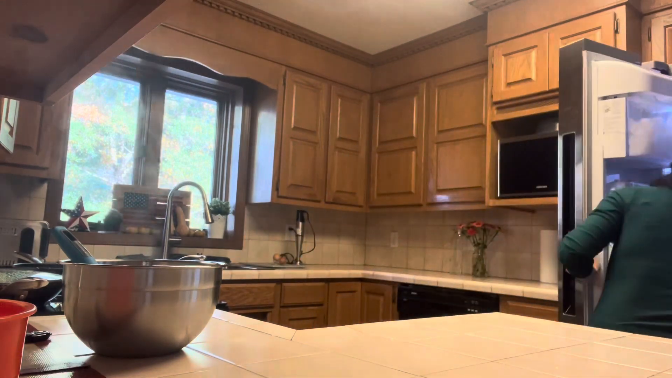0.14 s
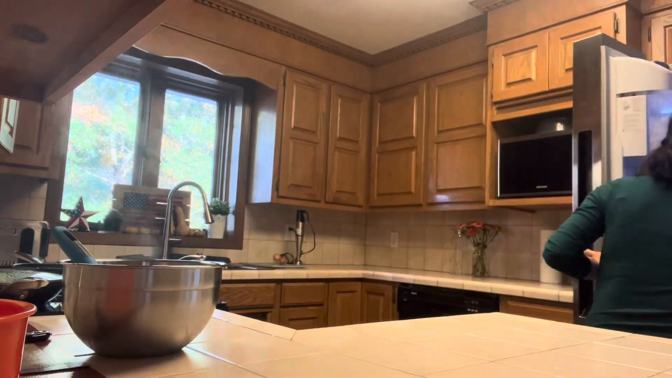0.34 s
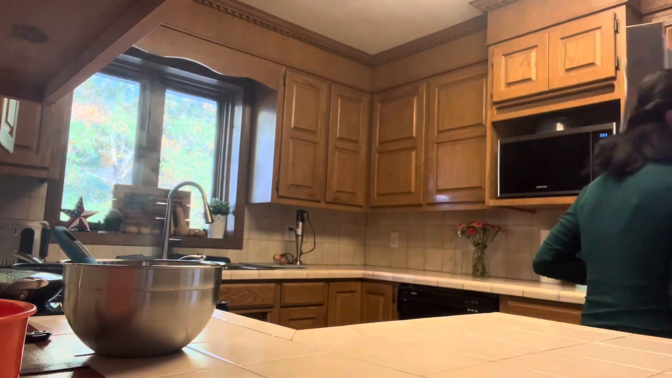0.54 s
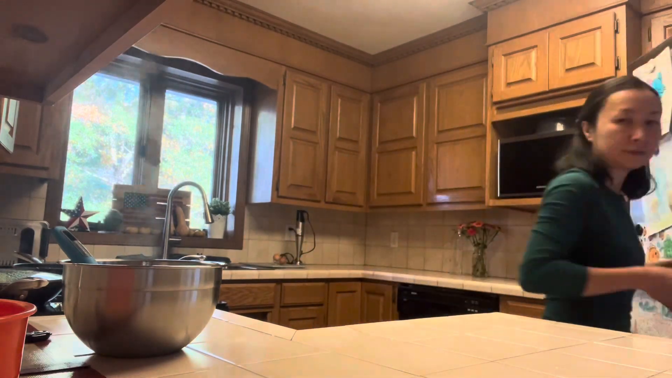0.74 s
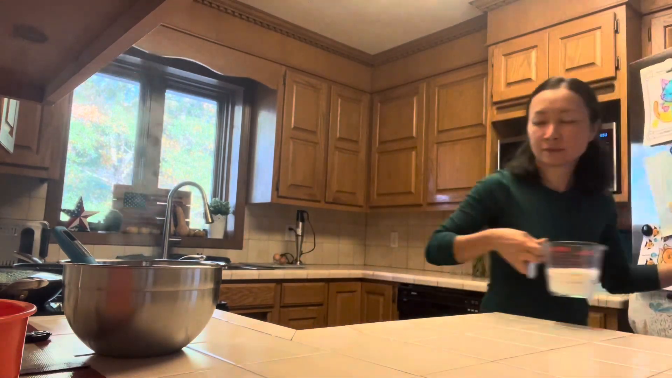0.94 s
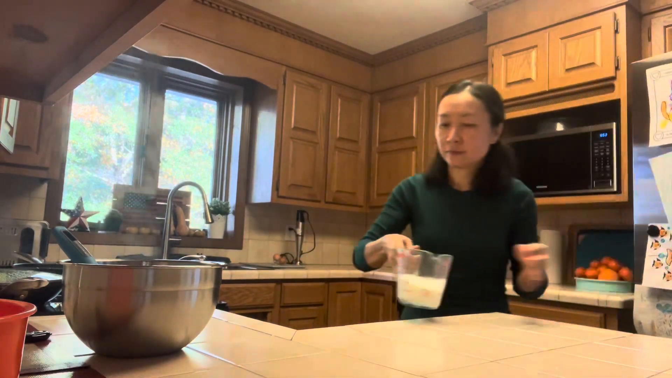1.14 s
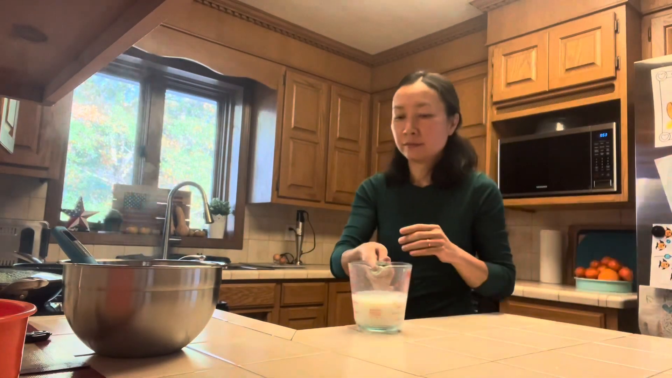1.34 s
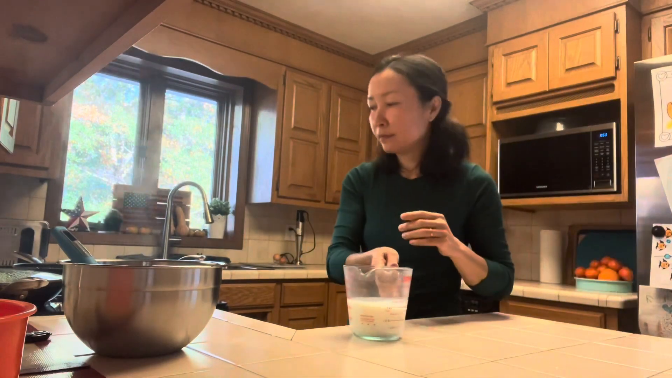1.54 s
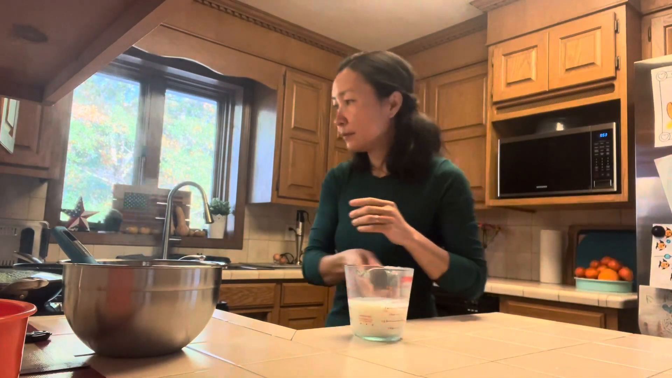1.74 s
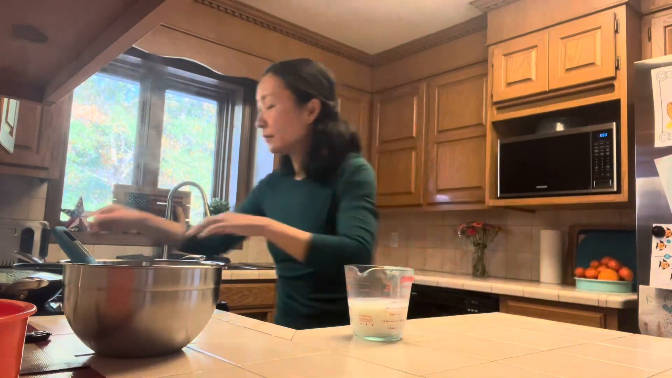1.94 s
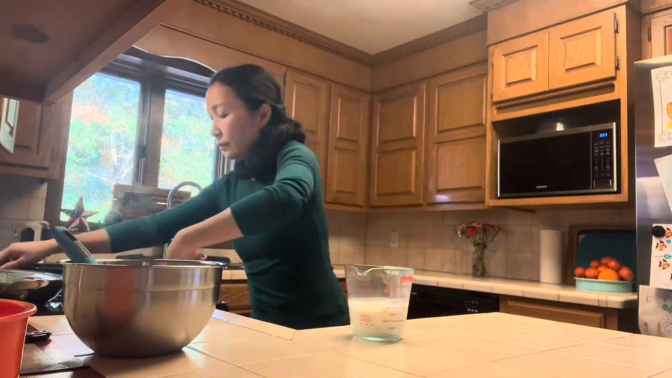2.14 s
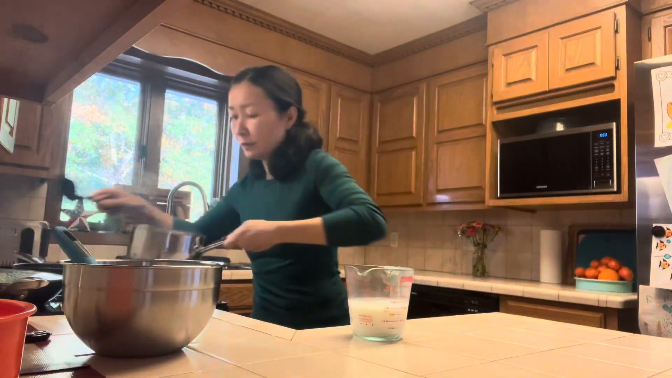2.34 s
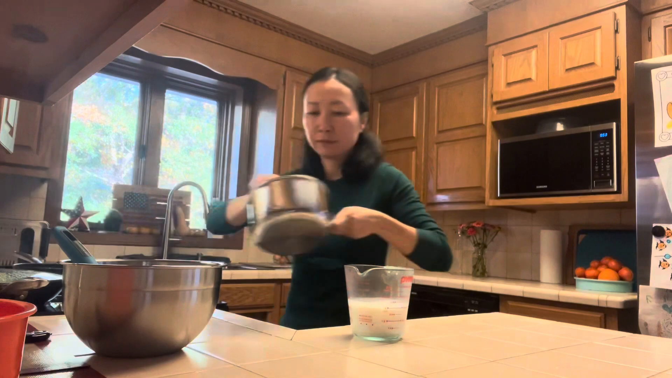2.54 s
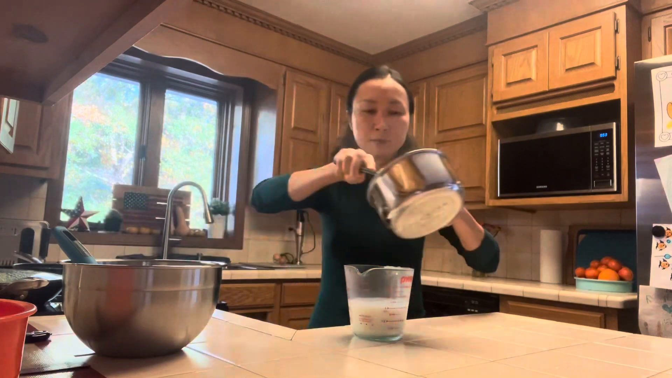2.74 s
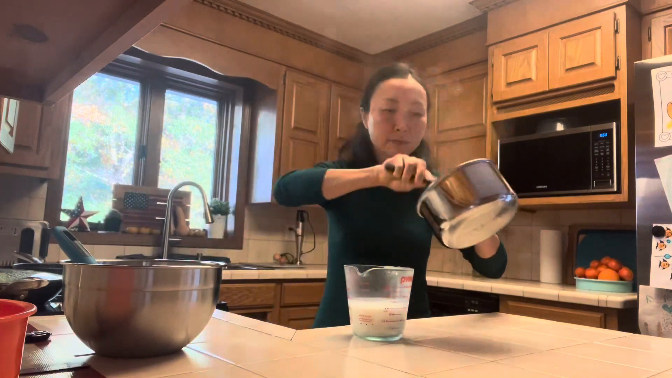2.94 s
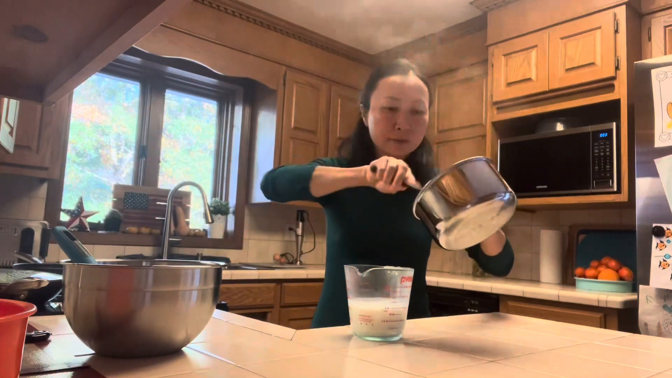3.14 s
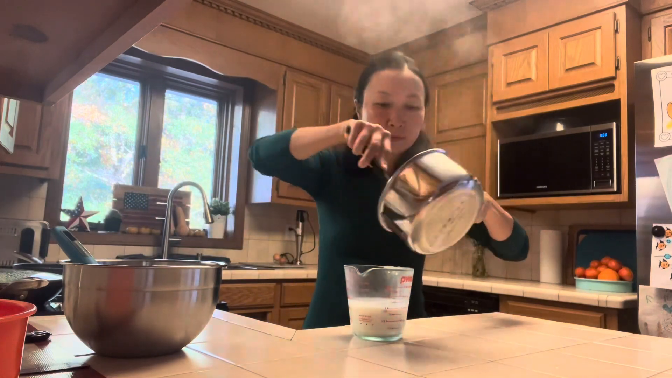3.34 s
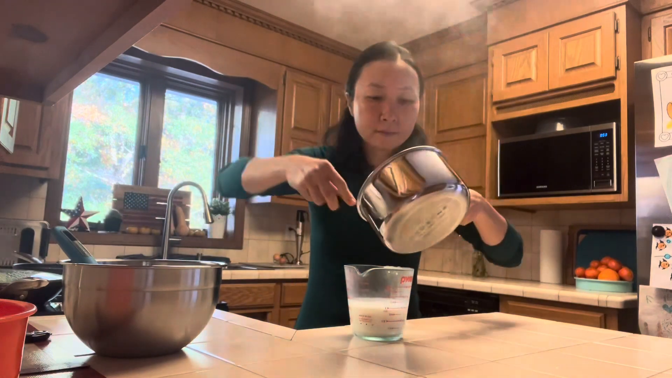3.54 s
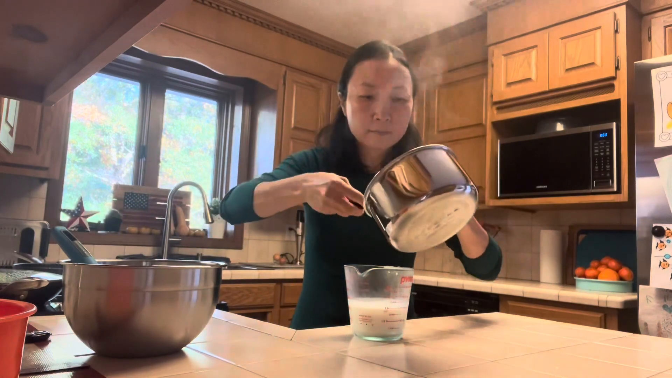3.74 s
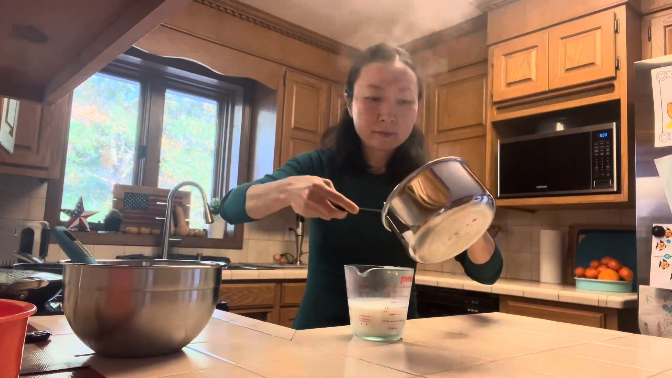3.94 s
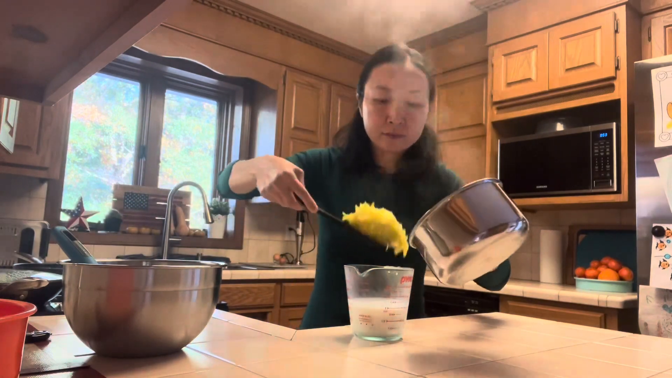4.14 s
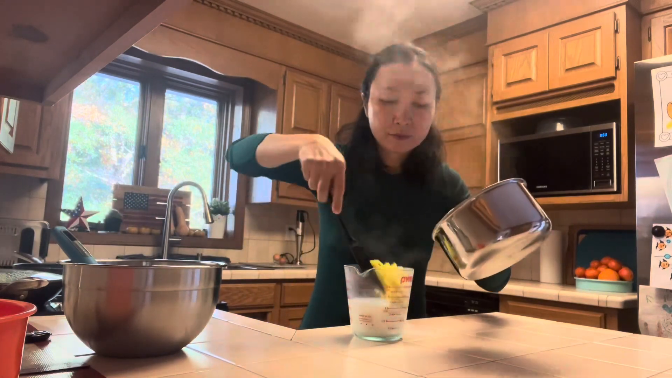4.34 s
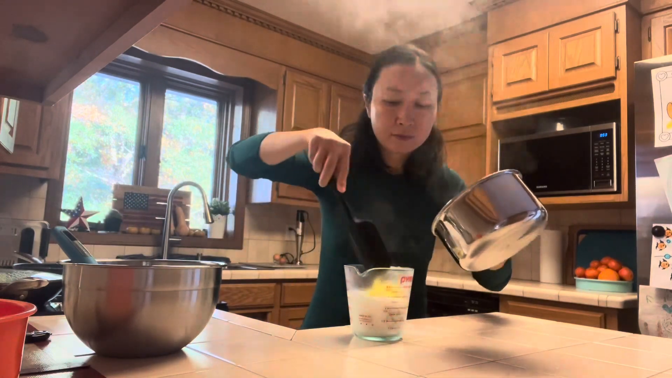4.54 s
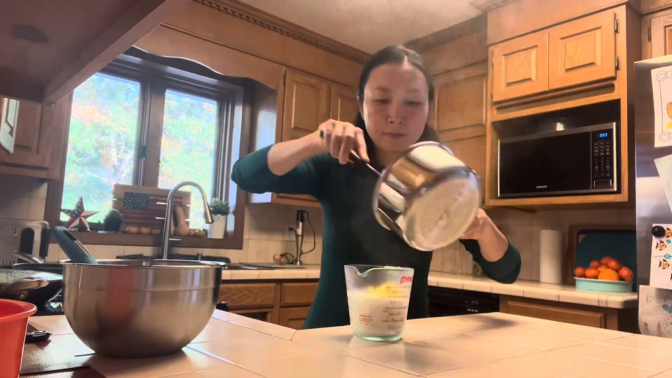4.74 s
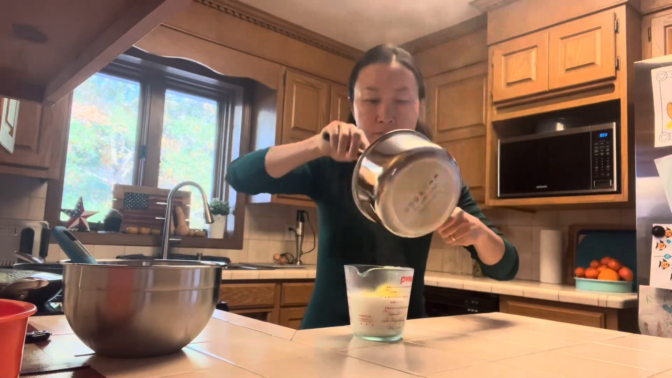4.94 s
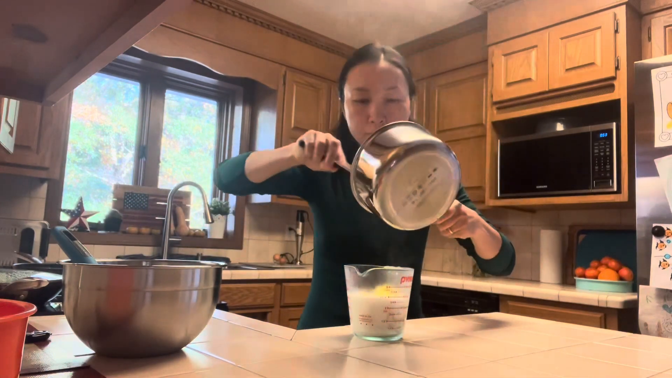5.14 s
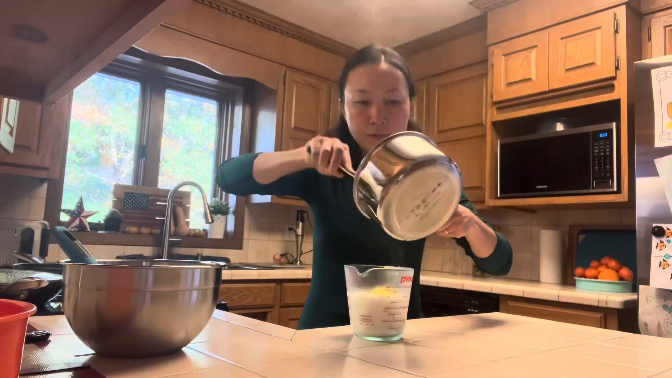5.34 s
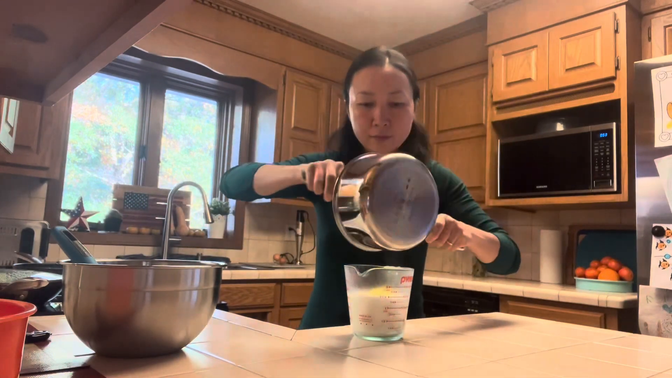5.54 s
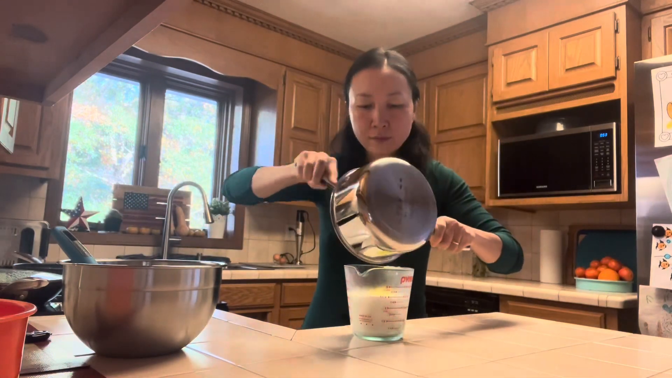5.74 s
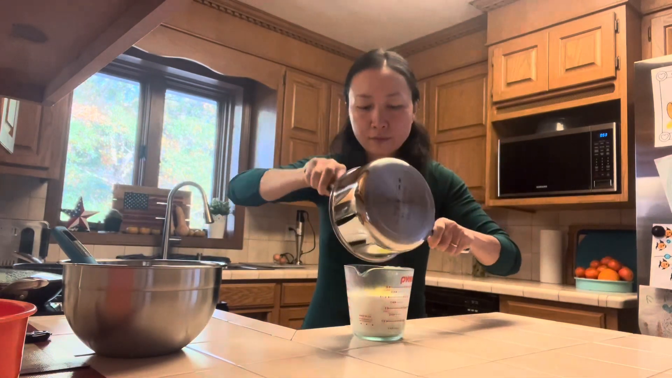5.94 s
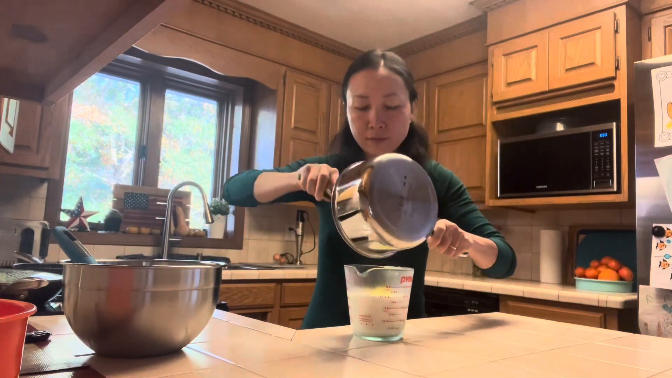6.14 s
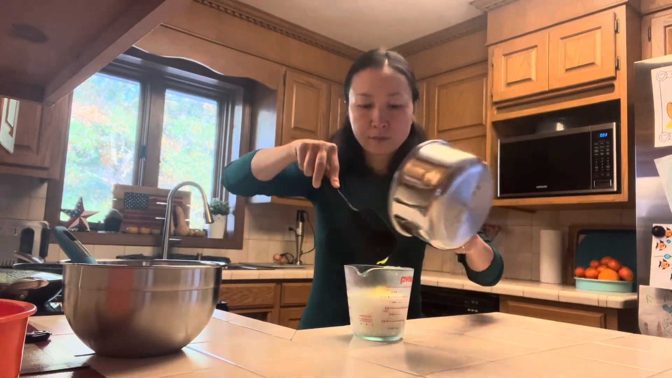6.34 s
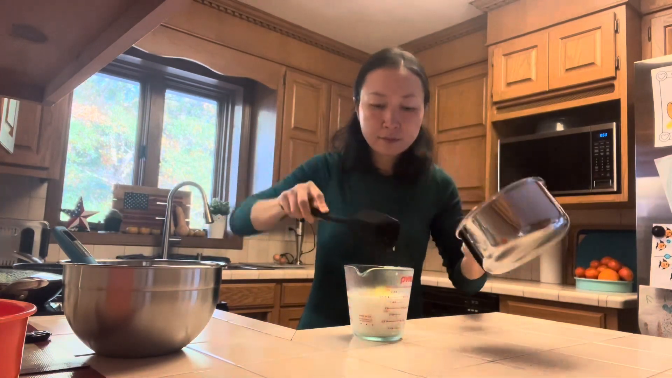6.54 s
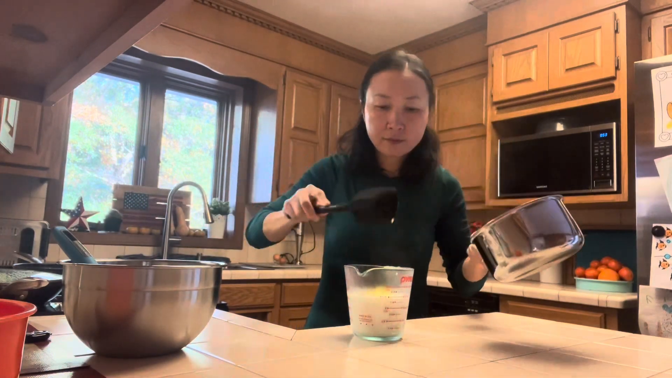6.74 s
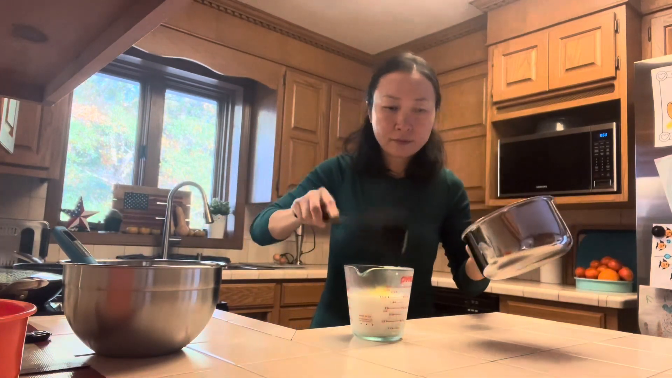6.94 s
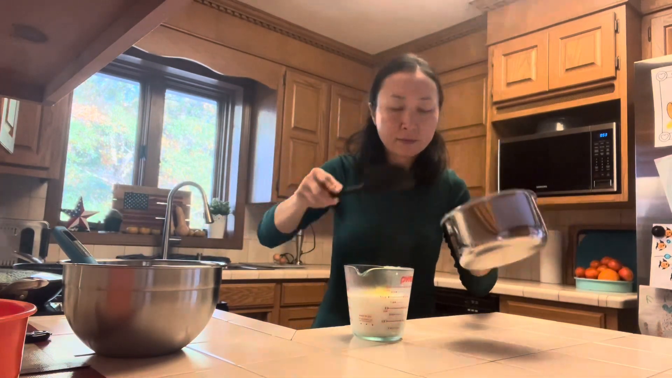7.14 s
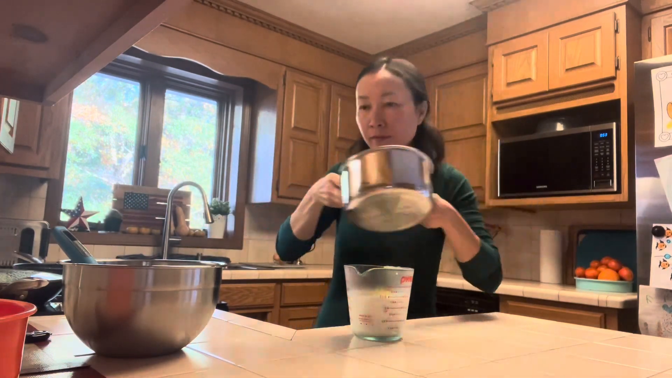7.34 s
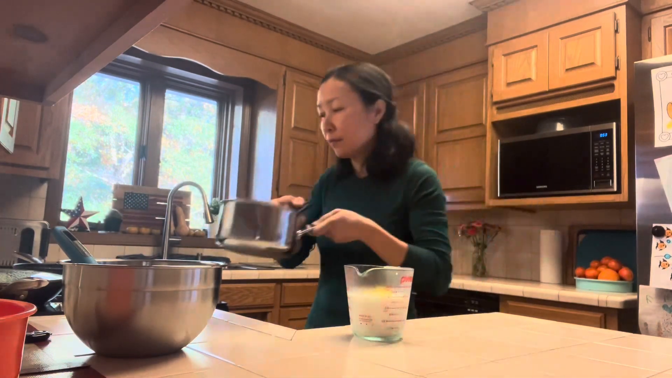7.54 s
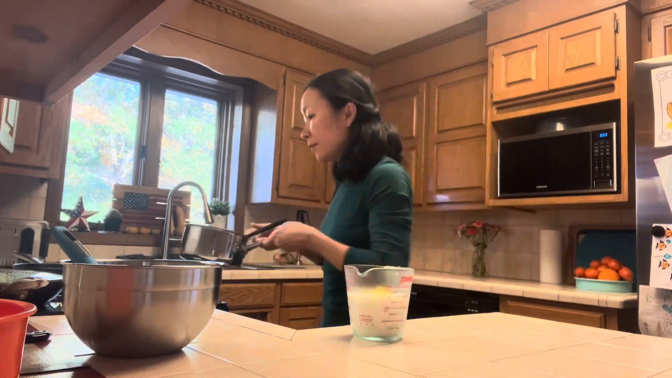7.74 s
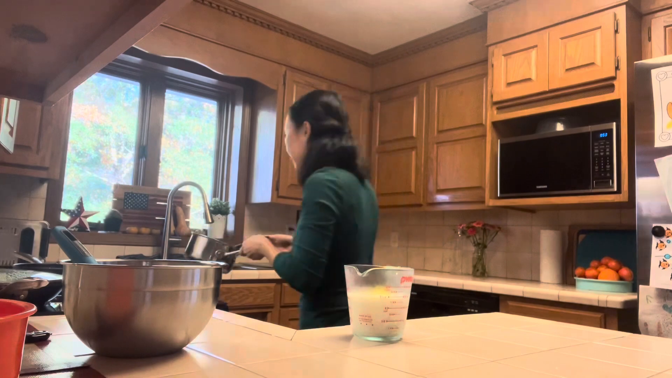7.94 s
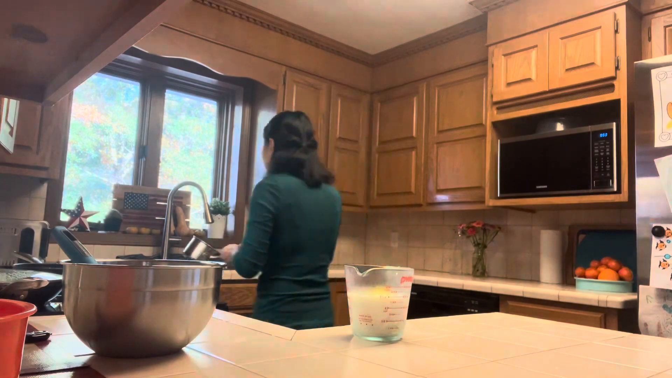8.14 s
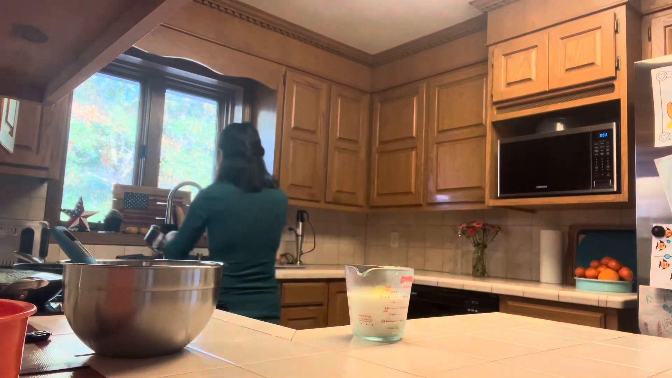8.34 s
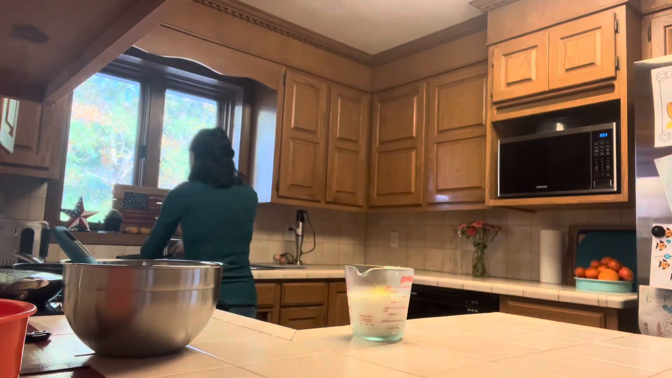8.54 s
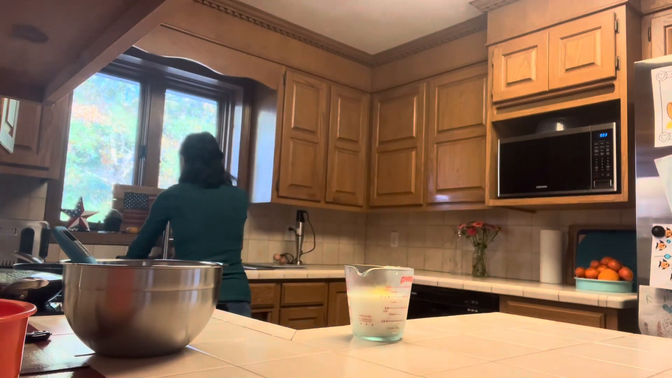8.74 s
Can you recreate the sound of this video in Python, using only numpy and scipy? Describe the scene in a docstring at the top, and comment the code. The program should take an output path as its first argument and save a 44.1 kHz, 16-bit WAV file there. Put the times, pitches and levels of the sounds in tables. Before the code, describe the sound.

In a quiet kitchen, plastic crackles, a glass jug clunks onto a tiled counter, and a spatula lightly taps and scrapes a steel pot.

```python
"""Jug and spatula in a quiet kitchen

A home kitchen, heard through two closely spaced microphone ports. Appliances murmur and drone; a separate
background hiss fades away. Plastic crackles at the fridge, far left; on the right a glass jug is set down on
the tiled counter and the slab clunks. A spatula taps and scrapes a steel pot, a little left, and its rubber
sticks and squeaks."""
import sys
import numpy as np
from scipy import signal
from scipy.fft import rfft, irfft, next_fast_len
from scipy.io import wavfile
from scipy.ndimage import uniform_filter1d

SR = 44100
rng = np.random.default_rng(int(sys.argv[2]) if len(sys.argv) > 2 else 0)


def transcribe(signal):
    """Save signal, clipped to [-1, 1], as a 16-bit WAV file at the path in sys.argv[1]."""
    frames = np.atleast_2d(signal).T
    limited = np.clip(frames, -1, 1)
    pcm = np.round(limited * 32767).astype(np.int16)
    wavfile.write(sys.argv[1], SR, pcm)


N = 391608

# blows: a faint knock at the very start, then blows on the counter: (time [s], peak [dB], weight [dB],
# brightness [dB], clunk [dB], clunk pitch [Hz])
COUNTER_BLOWS = [(0.007, -28, -1, 1, -33.5, 530), (1.32, -12.5, -13, -7, -20, 136),
                 (1.33, -24, 32, 37, -50, 136), (1.36, -6.5, -4.5, 5.5, -23, 930),
                 (1.366, -29, -2, -29, -21.5, 1000), (1.4178, -10.5, -13, 2.5, -23, 815),
                 (1.423, -13.5, -3.5, -16, -27, 826), (1.432, -15.5, -20, -10.5, -24, 931),
                 (2.481, -40, -1.5, -24, -41.5, 990), (3.683, -43, -5.5, -14, -47, 1230),
                 (6.016, -36.5, -2, -10, -37.5, 970), (6.646, -24.5, 5.5, -1, -46, 793),
                 (8.4492, -32, -8, -28, -38, 834), (8.543, -41, -2, -29, -42.5, 880),
                 (8.613, -42, -24, -35, -44, 960)]
# resonances of the slab: (frequency [Hz], level [dB], t60 [s])
COUNTER_MODES = [(136, 2.5, 0.037), (560, -3.5, 0.07), (847, 2.5, 0.02), (1022, 3.5, 0.05),
                 (1310, -3, 0.088), (2620, -2.5, 0.014), (3550, -11, .05)]
# how alike the two ports hear the room: (frequency [Hz], correlation [-1 to 1])
PORT_LIKENESS = [(60, 1), (180, 0.85), (550, 0.58), (1650, -0.47), (9000, -0.053), (13500, -0.59)]


def gain_of(db):
    """Decibels to amplitude."""
    return 10 ** (np.asarray(db) / 20)


def unit_rms(x):
    """Scales to rms 1."""
    return x / np.sqrt(np.mean(x ** 2) + 1e-20)


def read(points, hz):
    """Looks a spectrum up on a log-frequency axis."""
    f, value = np.transpose(points)
    return np.interp(np.log(hz + 1), np.log(f + 1), value)


def add(mix, start_s, sound):
    """Mixes a sound in at a time."""
    part = mix[max(round(start_s * SR), 0):][:len(sound)]
    part += sound[:len(part)]


def coloured(x, spectrum):
    """Filters by a spectrum table."""
    size = next_fast_len(len(x))
    return irfft(rfft(x, size) * gain_of(read(spectrum, np.fft.rfftfreq(size, 1 / SR))), size)[:len(x)]


def causal(gain):
    """Adds the phase that lets a click through the gain curve start sharply."""
    log_gain = np.log(np.r_[gain, gain[-2:0:-1]] + 1e-5)
    return gain * np.exp(-1j * signal.hilbert(log_gain).imag[:len(gain)])


def ringing(modes):
    """One dying sine for each mode of a struck body, energy 1 in all."""
    t = np.arange(6000) / SR
    rings = np.array([gain_of(db - 60 * t / t60) * np.sin(2 * np.pi * hz * t) for hz, db, t60 in modes])
    return rings / np.linalg.norm(rings)


def blows(events, spectrum, modes, ring_db, low_hz, high_hz, rise, tick, contact_ms):
    """A tick and a dying noise burst ring a body; weight acts below low_hz, brightness above high_hz.
    Row 0 flies straight to the microphone; row 1, a smoother click, feeds the room."""
    firm_db, shorter_per_db = -28, .015  # harder blows have a shorter contact
    out, hz = np.zeros((2, N)), np.fft.rfftfreq(8192, 1 / SR)
    t_ms = np.arange(8192) * 1000 / SR
    low, high = 1 / (1 + (hz / low_hz) ** 4), 1 / (1 + (high_hz / (hz + 1)) ** 4)
    body = causal(unit_rms(gain_of(read(spectrum, hz))))
    rings = rfft(ringing(modes), 8192)
    for start_s, peak_db, weight_db, bright_db, *_ in events:
        noise = rng.standard_normal(8192)
        decay_ms = contact_ms * np.exp(-shorter_per_db * (peak_db - firm_db))
        burst = noise * (1 - np.exp(-t_ms / (rise * decay_ms))) * np.exp(-t_ms / decay_ms)
        edge = tick * min(contact_ms / decay_ms, 1) ** 2  # the hard edge lands softly in light blows
        burst[round(rise * decay_ms * SR / 1000)] += edge * np.linalg.norm(burst)
        spot = gain_of(ring_db + 3.5 * noise[:len(modes)])  # the struck spot favours some modes
        colour = (body + spot @ rings) * causal(gain_of(low * weight_db + high * bright_db))
        blow = irfft(rfft(burst) * colour)
        click = irfft((np.linalg.norm(burst) + .5 * rfft(burst)) * colour)
        usual_peak = 2.3 * np.sqrt(uniform_filter1d(blow ** 2, 130).max())  # from the loudest 3 ms
        add(out[0], start_s, gain_of(peak_db) * blow / usual_peak)
        add(out[1], start_s, gain_of(peak_db) * click / usual_peak)
    return out


def friction(strokes, spectrum, grains_per_s, spread_db, rise_share, fade_db):
    """Dense uneven grains; pressure builds over rise_share of a stroke, then eases at fade_db a length."""
    level = np.zeros(N)
    for start_s, length_s, db in strokes:
        progress = np.linspace(0, 1, round(length_s * SR))
        easing_db = fade_db * np.maximum(progress - rise_share, 0)
        pressure = np.minimum(progress / rise_share, 1) * gain_of(db - easing_db)
        add(level, start_s, pressure * signal.windows.tukey(len(progress), .1))
    sizes = gain_of(spread_db * np.minimum(rng.exponential(1, N), 4)) * rng.standard_normal(N)
    grains = sizes * (rng.random(N) < grains_per_s / SR)
    return level * unit_rms(coloured(grains, spectrum))


def diffuse_noise(spectrum, patchy_db):
    """Noise partly alike at the two ports, with patches of its spectrum swelling and sinking."""
    frames, hz = N // 512 + 5, np.fft.rfftfreq(2048, 1 / SR)
    a, b, c, d, patches = rng.standard_normal((frames, 1025, 5)).T
    patches = unit_rms(uniform_filter1d(uniform_filter1d(patches, 20, axis=0), 6, axis=1))
    likeness = np.clip(read(PORT_LIKENESS, hz), -1, 1)[:, None]
    left, unrelated = a + 1j * b, c + 1j * d
    ports = np.array([left, likeness * left + np.sqrt(1 - likeness ** 2) * unrelated])
    ports *= gain_of(read(spectrum, hz)[:, None] + patchy_db * patches)
    return unit_rms(signal.istft(ports, nperseg=2048, noverlap=1536)[1][:, :N])


def room_tone():
    """The room tone: a low murmur, narrow wavering drones and a hiss that fades."""
    # spectra of murmur and hiss: (frequency [Hz], level [dB])
    murmur_spectrum = [(55, -19), (110, -3.5), (200, -7.5), (320, -10.5), (560, -16), (1050, -21.5),
                       (1400, -32), (4400, -42.5), (5400, -64), (11000, -60.5), (13300, -47), (14500, -69)]
    hiss_spectrum = [(500, -30.5), (866, 3.5), (1530, -5.5), (3150, -7.5), (12000, -16.5), (15800, -20)]
    # fade of the hiss: (time [s], level [dB])
    hiss_fade = [(0.0, -56.5), (0.4, -63), (1.5, -61.5), (2.6, -65.5), (3.301, -69.5), (3.8, -78.5),
                 (5.0, -84), (6.5, -85.5), (8.88, -79.5)]
    # droning resonances: (frequency [Hz], filter width [Hz], level [dB])
    drone_bands = [(130.4, 23, -65.5), (165.2, 3.3, -70.5), (240.6, 7.3, -63), (310.9, 45, -66.5),
                   (536, 35, -70)]
    drones = np.zeros(N)
    for hz, width_hz, db in drone_bands:
        resonance = signal.iirpeak(hz, hz / width_hz, SR)
        band = signal.lfilter(*resonance, rng.standard_normal(N))
        drones += gain_of(db) * unit_rms(signal.lfilter(*resonance, band))
    hiss_db = np.interp(np.arange(N) / SR, *np.transpose(hiss_fade))
    hiss = gain_of(hiss_db) * diffuse_noise(hiss_spectrum, patchy_db=1.1)
    murmur = gain_of(-58.5) * diffuse_noise(murmur_spectrum, patchy_db=1.5)
    return murmur + drones * gain_of([[-.6], [.6]]) + hiss


def counter_knocks():
    """Blunt blows, most of them on tile, loudest as the glass jug lands."""
    # struck tile: (frequency [Hz], level [dB])
    tile = [(60, -49.5), (125, -13), (286, -3.5), (462, -10), (963, -5), (1420, -9.5), (2830, -18),
            (4500, -26.5), (12000, -58)]
    return blows(COUNTER_BLOWS, tile, COUNTER_MODES, ring_db=-18, low_hz=530, high_hz=1887,
                 rise=0.36, tick=0.39, contact_ms=3.9)


def counter_clunks():
    """Under each knock a soft, rattling push rings the slab's modes near the pitch of the clunk."""
    out, rings = np.zeros(N), ringing(COUNTER_MODES)
    push, settle_s = np.hanning(20), 0.0036
    settling = np.exp(-np.arange(SR // 20) / (settle_s * SR))
    bass_cut = signal.butter(2, 100, "high", fs=SR)  # the slab sheds little deep bass
    for start_s, *_, peak_db, hz in COUNTER_BLOWS:
        octaves_away = abs(np.log2(np.transpose(COUNTER_MODES)[0] / hz))
        ring = gain_of(-22 * octaves_away) @ rings
        rattle = np.convolve(push, rng.standard_normal(len(settling)) * settling)
        clunk = signal.lfilter(*bass_cut, signal.oaconvolve(ring, rattle))
        add(out, start_s, gain_of(peak_db) * clunk / abs(clunk).max())
    return out


def plastic_crackle():
    """Plastic at the fridge snaps sharply and rustles as it drags."""
    # snaps: (time [s], peak [dB], weight [dB], brightness [dB])
    snaps = [(0.2717, -24, -2, -2), (0.3141, -32, 3, 2), (0.4217, -28, -3, 7.5), (0.449, -29, -8, 4),
             (0.4572, -26.5, -27, 7.5), (0.4973, -22.5, -12.5, 10), (0.533, -27, -5, 11.5),
             (0.5541, -27, -2, -4), (0.6005, -27.5, 2, 4.5), (0.6202, -33, -5, 10), (0.6516, -26, 3.5, 8.5),
             (0.6759, -29.5, -10, 4), (0.757, -30, 1, 5)]
    # rustles: (time [s], length [s], level [dB])
    rustles = [(.198, 0.071, -44), (.3, 0.034, -51), (.408, 0.061, -49), (.5, 0.28, -59.5),
               (.728, 0.039, -44)]
    # crinkling plastic: (frequency [Hz], level [dB])
    crinkle = [(300, 3), (800, 10.5), (1500, -0.5), (2680, 2.5), (4200, 1.5), (8900, -7), (15500, -3)]
    # its one resonance: (frequency [Hz], level [dB], t60 [s])
    modes = [(2570, 4, 0.058)]
    snapping = blows(snaps, crinkle, modes, ring_db=-27, low_hz=910, high_hz=9100,
                     rise=0.5, tick=0.95, contact_ms=0.62)
    rustling = friction(rustles, crinkle, grains_per_s=11000, spread_db=0.5, rise_share=0.22, fade_db=14)
    return snapping + rustling


def spatula_on_pot():
    """Light utensil taps ring out over steel; from 2.3 s on they are mostly the spatula on the pot. Faint
    scrapes run over it."""
    # taps: (time [s], peak [dB], weight [dB], brightness [dB])
    taps = [(1.085, -34.5, 4, 2.5), (1.2706, -29, 0.5, 2.5), (1.7377, -40, -1, 0), (1.7981, -37, -1, 2),
            (1.9671, -45.5, -1, 1), (2.0865, -29, 0.5, -1.5), (2.2894, -33.5, 3, -0.5),
            (2.337, -33.5, -7, -2.5), (2.4805, -34, -16, 6.5), (2.7431, -44.5, -7, 1),
            (3.0319, -42.5, -2, 1.5), (3.1884, -27.5, -0.5, -3), (3.244, -30.5, -3.5, 5),
            (3.4023, -29.5, -0.5, -4), (3.605, -50.5, 8, 6), (3.851, -39, 4, 1.5), (3.8764, -41.5, 1, 1),
            (3.9252, -41.5, 5, 3), (4.0067, -31.5, -6.5, -2), (4.4527, -39, 9, 4),
            (4.5527, -31.5, -6.5, -5.5), (4.6019, -30.5, 9.5, 5.5), (5.03, -50, 2.5, 4.5),
            (5.1397, -35, -4, -1.5), (5.2509, -39, -7, -2), (5.288, -45.5, -3, 4), (5.3734, -41, 5, 1.5),
            (5.452, -47, 11, -7), (5.692, -58.5, -1.5, 51.5), (5.832, -58, -2, 6.5), (5.9607, -47.5, -1, 6),
            (5.996, -44, 3, 13), (6.0153, -31.5, 6.5, 7), (6.101, -44.5, -4, 4), (6.6897, -41, 10.5, 3.5),
            (6.7978, -40.5, 16, 5), (6.8121, -35.5, -10.5, 1.5), (6.88, -44, -0.5, -1), (7.0401, -36, 2, 4),
            (7.4698, -31, -1.5, 1), (7.7417, -44, 0, -5.5), (8.05, -42.5, 3, -0.5),
            (8.1417, -29.5, -3.5, 0), (8.478, -33, 3, 3.5), (8.7295, -24.5, -10.5, -3.5)]
    # scrapes: (time [s], length [s], level [dB])
    scrapes = [(2.738, 0.085, -61), (2.985, 0.23, -62), (4.29, 0.2, -74), (5.95, 0.26, -58.5),
               (8.455, 0.13, -53.5), (8.54, 0.11, -55)]
    # the steel wall: (frequency [Hz], level [dB])
    steel = [(180, -31), (300, -10), (532, -1.5), (1040, -11.5), (1760, -18), (2050, -9.5), (2900, -12),
             (6130, -23.5), (14700, -23.5)]
    # resonances of the pot: (frequency [Hz], level [dB], t60 [s])
    modes = [(528, 6, 0.04), (935, -2, .05), (2050, -1, .03), (2430, -3, .06), (2700, 1, .04),
             (3020, -2, .04)]
    tapping = blows(taps, steel, modes, ring_db=-13, low_hz=906, high_hz=4000,
                    rise=0.75, tick=0.62, contact_ms=1.9)
    scraping = friction(scrapes, steel, grains_per_s=33000, spread_db=8.5, rise_share=0.14, fade_db=25.5)
    return tapping + scraping


def counter_slides():
    """Things dragged a short way over the counter rub the slab into sound."""
    # slides: (time [s], length [s], level [dB])
    slides = [(1.44, 0.2, -36), (1.542, 0.026, -34.5), (2.56, 0.18, -58.5), (2.78, 0.061, -58.5),
              (2.97, 0.13, -59.5)]
    # the rubbed slab: (frequency [Hz], level [dB])
    drag = [(300, -11.5), (650, 3.5), (900, 6), (1200, -0.5), (1700, -8.5), (2500, -8.5), (6000, -38.5)]
    return friction(slides, drag, grains_per_s=7500, spread_db=2.5, rise_share=0.24, fade_db=29)


def spatula_squeaks():
    """Rubber sticks and slips on steel: thin, unsteady whistles with two overtones."""
    # squeaks: (time [s], length [s], level [dB], second partial against the first [dB])
    squeaks = [(3.166, 0.04, -54, -15), (3.552, 0.046, -73, -20.5), (3.683, 0.059, -69, -11),
               (4.446, 0.065, -69, -12.5), (4.792, 0.11, -73.5, -11.5), (5.291, 0.039, -66, -25),
               (5.331, 0.052, -70, 2), (5.473, 0.045, -75, -15), (7.425, 0.048, -63.5, -2),
               (8.44, 0.13, -61, -5.5), (8.6, 0.11, -64.5, -17)]
    out, partials_hz = np.zeros(N), (2410, 4640, 7500)
    for start_s, length_s, level_db, second_db in squeaks:
        t = np.arange(0, length_s, 1 / SR)
        wavers = unit_rms(uniform_filter1d(rng.standard_normal((3, len(t))), 220, axis=1))
        tone = sum(gain_of(db) * (1 + .6 * waver) * np.sin(2 * np.pi * hz * t + .4 * waver[::-1])
                   for hz, db, waver in zip(partials_hz, (0, second_db, -22), wavers))
        add(out, start_s, gain_of(level_db) * tone * signal.windows.tukey(len(t), .4))
    return out * gain_of([[0], [-9]])  # row 1: thin tones stir the room little


def kitchen_echo(x):
    """Sparse reflections of random sign, each band dying at its own speed."""
    # decay of the room: (frequency [Hz], t60 [s])
    decay = [(250, 0.24), (1000, 0.14), (3000, 0.21), (8000, .25), (15000, 0.08)]
    # how strongly it answers: (frequency [Hz], level [dB])
    strength = [(300, -5), (1000, -0.5), (3000, -3.5), (8000, -0.5)]
    echoes = np.zeros((2, SR // 2))
    arrivals = np.arange(100, SR // 2 - 20, 20) + rng.integers(0, 20, (2, (SR // 2 - 101) // 20))
    np.put_along_axis(echoes, arrivals, rng.choice([-1., 1.], arrivals.shape), 1)
    hz, t, ports = signal.stft(echoes, SR, nperseg=256)
    likeness = np.clip(read(PORT_LIKENESS, hz), 0, 1)[:, None]  # long waves reach both ports alike
    ports[1] = likeness * ports[0] + np.sqrt(1 - likeness ** 2) * ports[1]
    tail_db = read(strength, hz)[:, None] - 60 * t / read(decay, hz)[:, None]
    tail = signal.istft(ports * gain_of(tail_db), SR, nperseg=256)[1]
    return signal.oaconvolve(x[None], tail / np.sqrt(arrivals.shape[1] / 40), axes=1)[:, :N]


def placed(x, lead_ms, left_db, room_db):
    """Sound reaches the left port lead_ms before the right; moving hands and body vary the echo paths."""
    moves_per_s = .7
    direct, room_feed = np.broadcast_to(x, (2, N))
    delay = np.sinc(np.arange(-64, 65) - lead_ms * SR / 1000) * np.hanning(129)
    ports = np.array([direct, signal.oaconvolve(direct, delay, "same")])
    turn = 2 * np.pi * moves_per_s * np.arange(N) / SR
    room = sum(kitchen_echo(room_feed * np.sqrt(2 / 3) * np.cos(turn + k * np.pi / 3)) for k in range(3))
    return ports * gain_of([[left_db / 2], [-left_db / 2]]) + gain_of(room_db) * room


def scene():
    """From the microphone: knocks and squeaks right, slab near the middle, plastic and pot left."""
    return (room_tone()
            + placed(counter_knocks() + spatula_squeaks(), lead_ms=-.35, left_db=0, room_db=-1)
            + placed(counter_clunks() + counter_slides(), lead_ms=-0.082, left_db=1, room_db=-2)
            + placed(plastic_crackle(), lead_ms=0.46, left_db=2, room_db=-2)
            + placed(spatula_on_pot(), lead_ms=0.13, left_db=2.5, room_db=1))


def record(dry):
    """The microphone drops the deep bass, and a steep band limit cuts the highest treble."""
    low_cut_hz, high_cut_hz = 58, 16400
    thinned = signal.lfilter(*signal.butter(3, low_cut_hz, "high", fs=SR), dry)
    band_limit = signal.firwin(201, high_cut_hz, window=("kaiser", 9), fs=SR)
    return signal.oaconvolve(thinned, band_limit[None], "same")


dry = scene()
out = record(dry)
transcribe(out)
```